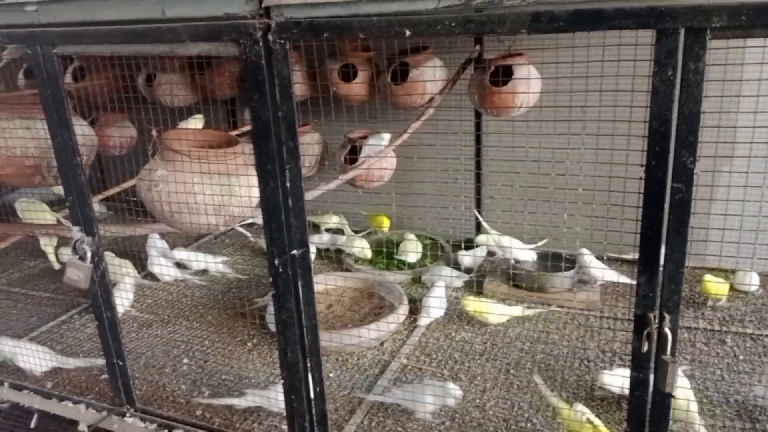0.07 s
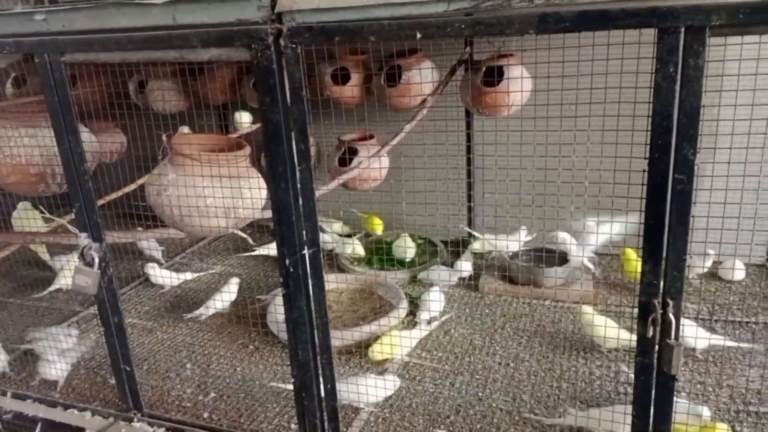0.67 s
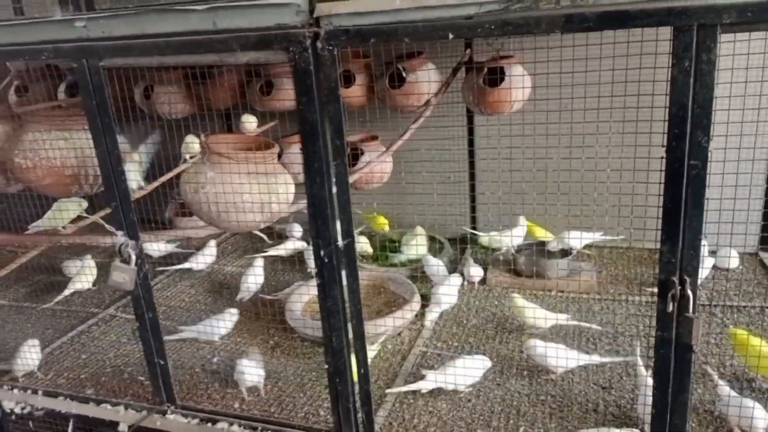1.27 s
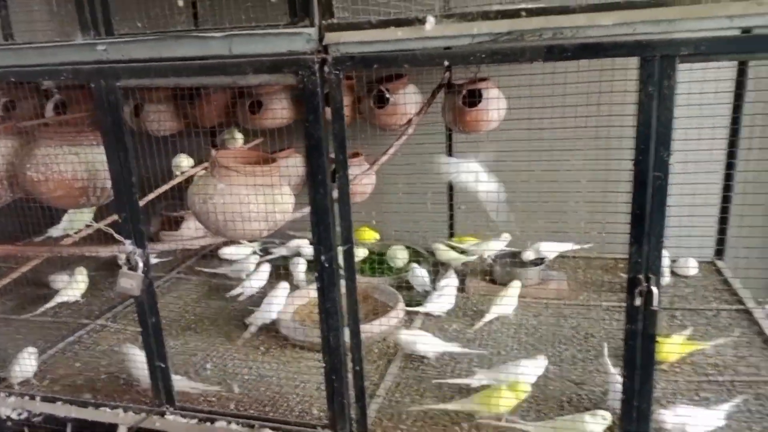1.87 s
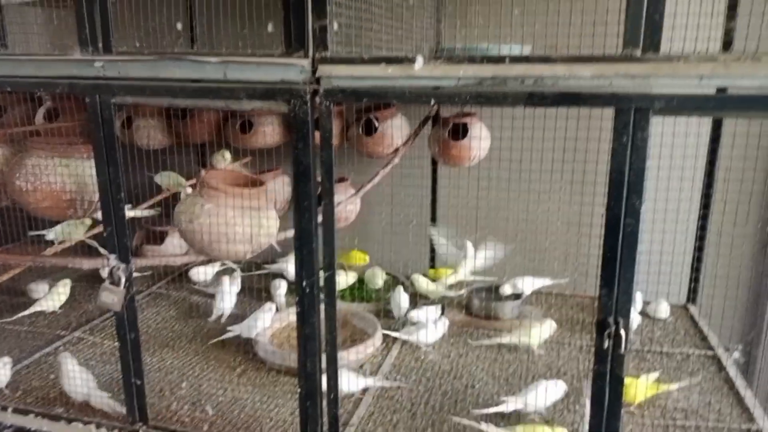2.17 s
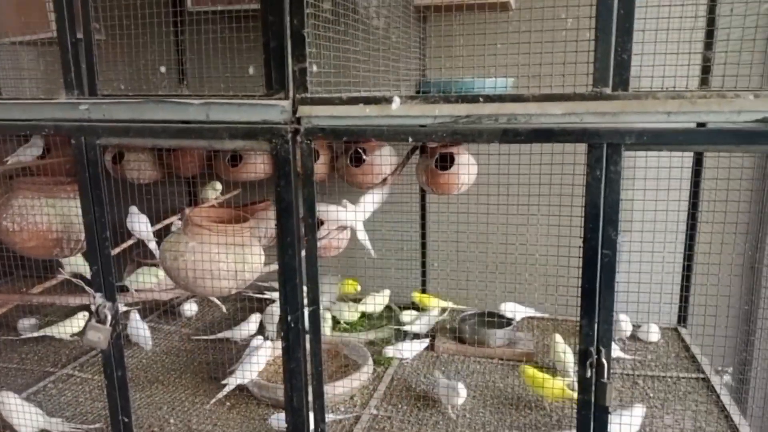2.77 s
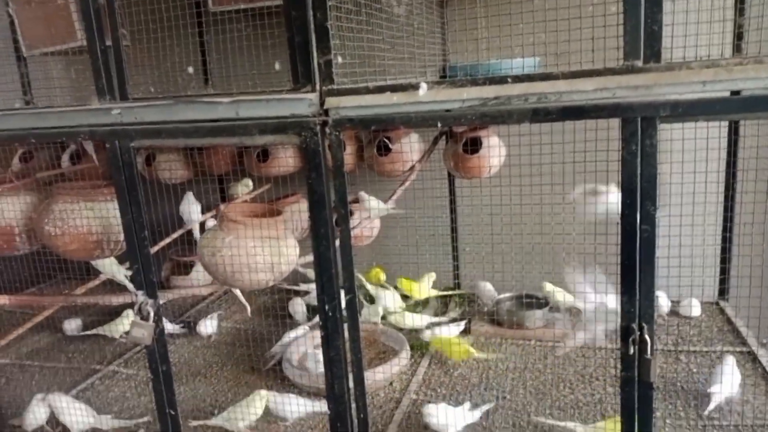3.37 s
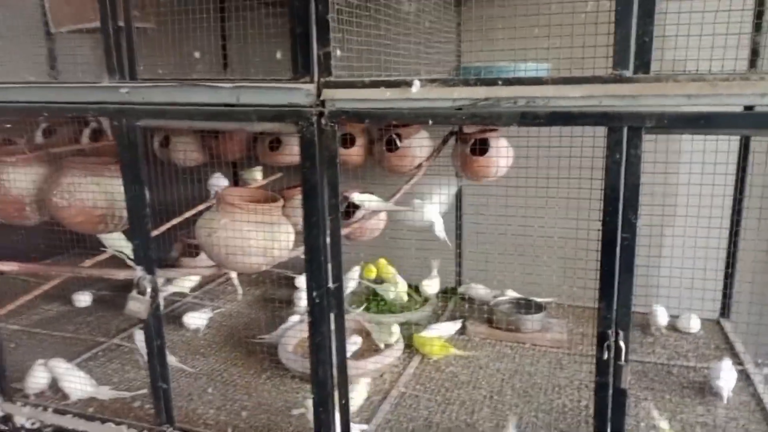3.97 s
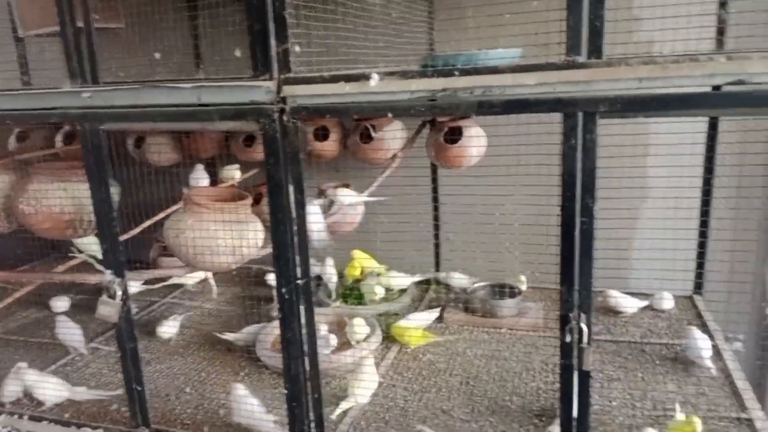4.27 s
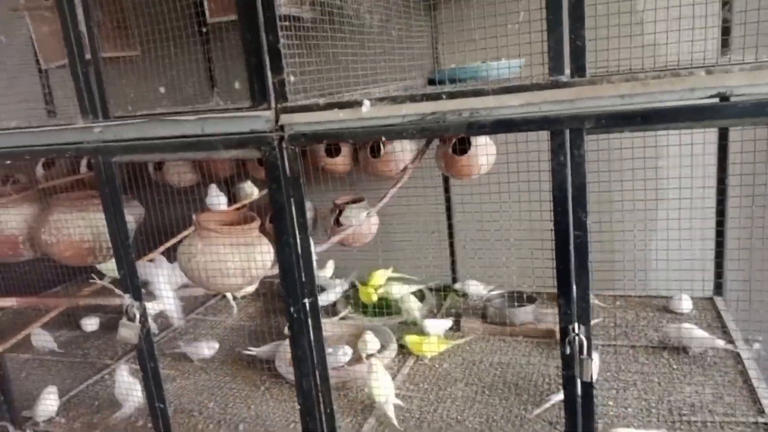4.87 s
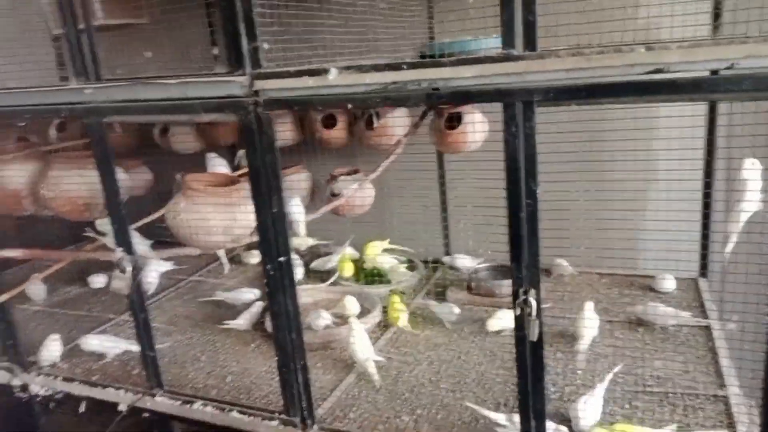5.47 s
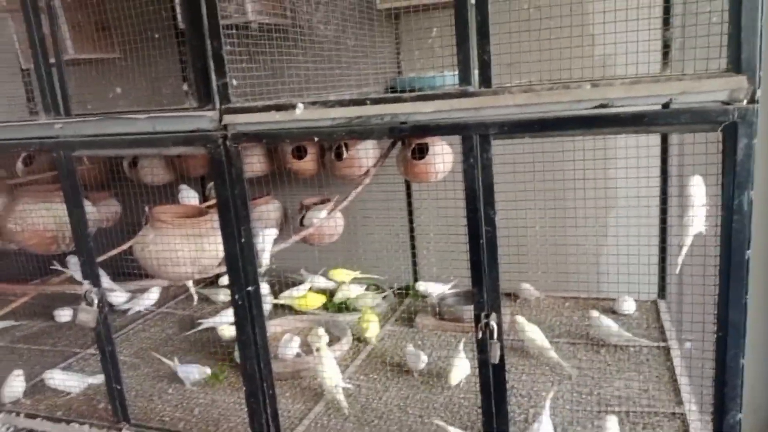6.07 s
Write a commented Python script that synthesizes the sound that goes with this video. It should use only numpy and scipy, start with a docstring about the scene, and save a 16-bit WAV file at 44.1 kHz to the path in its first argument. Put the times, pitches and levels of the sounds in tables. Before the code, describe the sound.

Close budgerigars chirp, warble and scold in short, high notes while more birds babble behind them, all ringing slightly off the aviary walls. The chatter thins for about a second near the middle, around two dull knocks, then returns with gliding calls and rasps. Now and then wings swish softly and a beak or claw ticks on the wire. The microphone is just outside the cage.

```python
"""A hard-walled aviary, heard through the wire from a step away: a flock of budgerigars chatters.
Near birds give four-syllable contact calls, chirp, slur, tweet and warble, each note a gliding tone of
the syrinx; slaps of the syrinx make their rasps. The rest babble behind. Wings swish, beaks and claws
tick on the wire, soft knocks ring a hollow body and feet patter.
The walls ring with all of it, over a low room rumble, hum and faint hiss."""
import sys
import numpy as np
from scipy import signal
from scipy.fft import rfft, irfft, next_fast_len
from scipy.io import wavfile
from scipy.ndimage import map_coordinates

SR = 44100
rng = np.random.default_rng(int(sys.argv[2]) if len(sys.argv) > 2 else 0)


def output_pcm(signal):
    """Save a mono or channel-first signal as 16-bit PCM at the path in sys.argv[1].

    Samples are clipped to [-1, 1] before scaling.
    """
    pcm = np.clip(np.atleast_2d(signal).T, -1, 1) * 32767
    wavfile.write(sys.argv[1], SR, np.round(pcm).astype(np.int16))


N = 269627

# Flip partials: (multiple of pitch, level [dB])
FLIP_TONE = [(1 / 2, -19), (1, 0), (3 / 2, -20), (2, -27), (5 / 2, -23)]
# Calls: (time [s], opening [Hz], closing [Hz], low syllable delay [s], low syllable [Hz],
# glide [share of pitch], level [dB], flip [Hz], flip level re call [dB])
CONTACT_CALLS = [(.629, 3514, 3480, 0.075, 3260, 0.025, -22, 4110, -15),
                 (2.766, 3398, 3630, 0.056, 3368, -0.029, -19.5, 3990, -2),
                 (3.689, 3484, 3568, 0.059, 3340, -0.017, -22.5, 3910, -9),
                 (4.822, 3612, 3750, 0.079, 3384, 0.057, -22, 3840, -0.5),
                 (5.203, 3435, 3400, 0.061, 3200, -0.018, -25.5, 3980, -10)]


def contact_calls(syllable_s=0.0287, flip_s=0.021, flip_after_s=0.032, close_after_s=0.103, swoop=2.14):
    """Pure whistle, higher flip, low syllable, burred close: all lean one way, the low one furthest."""
    out = np.zeros(N)
    for s, open_hz, close_hz, low_after_s, low_hz, slope, db, flip_hz, flip_db in CONTACT_CALLS:
        opening = syllable(syllable_s, open_hz, slope, rough=0.09)
        flip = syllable(flip_s, flip_hz, slope, rough=0.24, tone=FLIP_TONE)
        low = syllable(syllable_s, low_hz, swoop * slope, rough=0.14)
        close = syllable(syllable_s, close_hz, slope, rough=0.33)
        add(out, s, undb(db) * opening)
        add(out, s + flip_after_s, undb(db + flip_db) * flip)
        add(out, s + low_after_s, undb(db - 2) * low)
        add(out, s + close_after_s, undb(db - 2.3) * close)
    return out


# Whistle partials: (multiple of pitch, level [dB])
CHIRP_TONE = [(1, 0), (2, -26), (3, -34)]


def syllable(length_s, hz, slope, rough, tone=CHIRP_TONE, arch=0.0036, quaver=0):
    """One note swells, slides through its pitch on a slight arch and fades."""
    pitches_hz = (hz * (1 - arch - slope / 2), hz, hz * (1 - arch + slope / 2))
    voice = syrinx(length_s, pitches_hz, rough, tone, quaver=quaver)
    return voice * gate(len(voice), 0.12 * length_s, 0.18 * length_s)


def syrinx(length_s, pitches_hz, rough, tone, jitter=0.086, flutter=0.0394, shimmer_db=6, split_db=-12,
           buzz=0.46, quaver=0, quaver_hz=59.3, reed_hz=620):
    """The syrinx glides through pitches evenly spaced in time; when rough it trembles and buzzes."""
    n = int(length_s * SR)
    contour = np.polyfit(np.linspace(0, 1, len(pitches_hz)), pitches_hz, len(pitches_hz) - 1)
    hz = np.polyval(contour, np.linspace(0, 1, n))
    swing = np.sin(phase_of(quaver_hz * (1 + 0.25 * wander(n, 40))))
    hz = hz * (1 + quaver * swing + rough * flutter * wander(n, 220.3))
    phase = phase_of(hz)
    # a slower membrane swing puts the same sidebands round every partial
    reed = np.sin(phase_of(reed_hz * (1 + 0.221 * wander(n, 60))))
    burr = phase_of(hz * rough * (jitter * wander(n, 1306.6) + 0.17 * buzz * reed))
    voice = sum(undb(db) * np.sin(k * phase + burr) for k, db in tone if k * hz.mean() < 12000)
    if tone is CHIRP_TONE or tone is SLUR_TONE:
        period_doubling = np.sin(phase / 2 + burr) + 0.6 * np.sin(3 * phase / 2 + burr)
        voice = voice + rough * undb(split_db) * period_doubling
    shimmer = 1.5 * np.tanh(wander(n, 364.5))
    return voice * unit(undb(shimmer_db * rough * shimmer)) * gate(n, 0.0015, 0.0029)


# Chirps: (time [s], length [s], pitch [Hz], glide [share of pitch], level [dB])
CHIRPS = [(0.013, 0.047, 3352, -0.14, -30.5), (0.014, 0.045, 1823, 0.19, -33.5),
          (0.308, 0.05, 3435, 0.04, -33), (0.404, 0.079, 3630, -0.033, -33),
          (0.575, 0.023, 2590, -0.089, -31), (0.668, 0.036, 2785, -0.024, -30.5),
          (0.888, 0.033, 2856, 0.026, -29), (0.936, 0.015, 3590, -0.0097, -24.5),
          (.975, .024, 3636, -0.011, -21.5), (0.99, 0.052, 3630, -0.054, -32.5),
          (1.149, 0.011, 3220, 0.02, -24.5), (1.372, 0.047, 3640, -0.26, -25.5),
          (1.447, 0.048, 2960, -0.116, -29.5), (1.478, 0.017, 3100, 0.014, -22.5),
          (1.571, 0.047, 3083, -0.047, -31), (1.615, 0.042, 3577, 0.073, -26),
          (1.664, 0.019, 3713, 0.024, -19), (1.705, 0.028, 3720, 0.057, -43),
          (1.972, 0.021, 2960, -0.018, -22), (2.011, 0.038, 3010, -0.042, -29.5),
          (2.046, 0.029, 3275, -0.048, -28.5), (2.108, 0.033, 3013, 0.049, -26),
          (2.299, 0.1, 3560, 0.059, -36), (2.746, 0.023, 3650, -0.11, -36.5),
          (3.271, 0.068, 3310, -0.051, -43), (3.346, 0.014, 2720, -0.04, -34),
          (3.351, 0.016, 4550, -0.015, -52), (3.36, 0.017, 3610, 0.0057, -33),
          (3.42, 0.024, 3140, -0.043, -24), (3.948, .115, 3676, 0.005, -32.5),
          (3.997, 0.0056, 3300, -0.46, -22), (4.075, 0.012, 3486, -0.036, -23.5),
          (4.134, 0.02, 4160, -0.022, -23), (4.255, 0.16, 1605, -.03, -41.5),
          (4.429, 0.033, 3878, -0.055, -23.5), (5.188, 0.052, 1695, 0.082, -39.5),
          (5.322, 0.052, 3290, -0.11, -30), (5.384, 0.023, 4250, -0.12, -30),
          (5.594, 0.021, 2746, 0.26, -32.5), (5.781, 0.026, 3425, 0.062, -33),
          (5.906, 0.058, 1164, -0.11, -33), (5.986, 0.042, 2020, -0.047, -35.5),
          (6.063, 0.061, 3410, -0.46, -37)]


def chirps(easy_hz=3410, held_s=0.05):
    """Single glides, hoarser away from the bird's easiest pitch; a held whistle stays purer."""
    out = np.zeros(N)
    for s, length_s, hz, slope, db in CHIRPS:
        octaves = np.log2(hz / easy_hz)
        strain = max(-0.56 * octaves, 0.53 * octaves)
        rough = 0.14 + 0.32 * strain if length_s > held_s else 0.21 + strain
        add(out, s, undb(db) * syllable(length_s, hz, slope, min(rough, 0.95)))
    return out


# Slur partials: (multiple of pitch, level [dB])
SLUR_TONE = [(1, 0), (2, -24), (3, -25), (4, -35)]
# Slurs: (time [s], length [s], start [Hz], 1/3 [Hz], 2/3 [Hz], end [Hz], level [dB], roughness [0-1])
SLURS = [(1.765, 0.075, 3594, 3970, 3700, 3320, -40.5, 0.54),
         (1.808, 0.038, 2140, 2420, 2863, 3100, -31.5, 1),
         (1.862, 0.036, 3290, 2790, 2100, 1980, -32, 0.83),
         (1.902, 0.046, 3300, 3900, 3790, 3320, -29.5, 0.57),
         (1.936, 0.042, 3160, 2307, 1940, 1910, -32, 0.39),
         (1.944, 0.025, 3900, 3840, 3710, 3420, -37, 0.56),
         (2.076, 0.026, 2920, 2185, 2330, 2730, -27, .45),
         (3.385, 0.045, 2570, 2680, 2960, 3100, -30, 0.63),
         (3.975, 0.027, 2205, 2300, 2790, 4160, -31, 0.63),
         (4.143, 0.053, 4190, 2750, 2850, 3720, -27.5, 0.41),
         (4.375, 0.047, 2947, 3100, 3043, 2680, -27.5, 0.57),
         (5.012, 0.082, 4720, 4840, 4760, 4130, -27, 0.384),
         (5.234, 0.066, 2095, 2800, 3200, 3230, -29.5, 0.52),
         (5.287, 0.031, 4626, 4320, 4105, 3430, -25.5, 0.59),
         (5.327, 0.016, 4040, 5200, 6000, 6100, -42, 0.4),
         (5.375, 0.025, 6700, 6000, 4880, 3700, -40.5, 0.36),
         (5.40, 0.082, 3526, 3133, 2510, 2760, -34.5, 0.35),
         (5.47, 0.05, 3110, 3780, 3700, 3420, -28.5, 0.65),
         (5.626, 0.039, 3450, 3680, 3735, 3590, -26.5, 0.55),
         (5.651, 0.055, 2937, 2690, 2527, 2440, -30, 0.38),
         (5.715, 0.052, 3812, 3450, 3415, 3480, -26, 0.63),
         (5.935, 0.044, 2610, 2914, 2976, 2700, -33, 0.34)]


def slurs():
    """Calls whose pitch arches, dips or hooks without a break."""
    out = np.zeros(N)
    for s, length_s, *pitches_hz, db, rough in SLURS:
        voice = syrinx(length_s, pitches_hz, rough, SLUR_TONE,
                       buzz=0.37, jitter=0.049, shimmer_db=7, split_db=-14)
        add(out, s, undb(db) * voice * gate(len(voice), 0.0098, 0.0032))
    return out


# Tweet partials: (multiple of second harmonic, level [dB])
TWEET_TONE = [(1 / 2, -13), (1, 0), (3 / 2, -19), (2, -29)]
# Tweets: (time [s], length [s], second harmonic [Hz], glide [share of pitch], level [dB])
TWEETS = [(0, 0.015, 6320, -0.0026, -25.5), (0.016, 0.021, 7050, 0, -38.5),
          (0.037, 0.01, 6400, -0.022, -26), (0.046, 0.0073, 6920, 0.031, -31),
          (0.061, 0.0287, 5900, -0.058, -23.5), (0.089, 0.035, 6045, 0.07, -23),
          (0.135, 0.043, 6180, 0.033, -21.5), (0.172, 0.083, 5780, -0.1, -29),
          (0.77, 0.012, 6380, -0.04, -24.5), (0.803, .075, 6270, -0.019, -36),
          (0.877, 0.0417, 6110, -0.014, -27), (1.017, 0.042, 5670, 0.0084, -27.5),
          (1.426, 0.0037, 6830, -0.13, -32), (1.755, 0.0069, 6230, -0.25, -38),
          (1.77, 0.008, 6470, -0.18, -43), (1.806, 0.007, 6150, -0.25, -32.5),
          (1.818, 0.0057, 6000, 0.069, -36), (1.854, 0.0049, 6300, -0.2, -33),
          (1.862, 0.013, 6330, 0.18, -33), (1.909, 0.023, 7780, 0.025, -41.5),
          (2.535, 0.0073, 6660, 0.14, -32.5), (2.564, 0.0093, 6400, 0.041, -23.5),
          (2.59, 0.0041, 6960, -0.04, -23), (2.615, 0.0069, 6150, 0.17, -33),
          (2.624, 0.021, 5520, -0.31, -30.5), (2.674, 0.0081, 6260, 0.26, -26.5),
          (3.45, 0.0055, 6670, -0.017, -23.5), (3.489, 0.009, 5920, -0.19, -31),
          (3.521, 0.01, 6160, -0.28, -35), (3.544, 0.013, 7050, 0.056, -38),
          (3.594, 0.0077, 6010, 0.09, -30.5), (3.605, 0.0157, 6100, -0.17, -31.5),
          (3.647, 0.021, 6100, -0.14, -33), (3.718, 0.01, 6180, -0.18, -28.5),
          (3.832, 0.019, 6010, -0.2, -36), (4.117, 0.018, 5710, -0.19, -29),
          (4.646, 0.027, 5880, -0.048, -34.5), (4.698, 0.031, 5950, 0.082, -34),
          (4.827, 0.0223, 6380, -0.1, -39), (4.883, 0.018, 6320, 0.056, -40),
          (5.259, 0.018, 6370, .03, -37.5), (5.478, 0.0064, 6660, 0.13, -33),
          (5.524, 0.0114, 5840, 0.18, -37), (5.552, 0.008, 5720, 0.15, -39),
          (5.591, 0.0085, 6370, -0.14, -26.5), (5.711, 0.012, 6200, 0.08, -37),
          (5.758, 0.013, 6110, 0.05, -38)]


def tweets(roughen_s=0.012):
    """High arched notes led by the second harmonic: clean when brief, rough and quavering when long."""
    out = np.zeros(N)
    for s, length_s, hz, slope, db in TWEETS:
        strain = 1 - np.exp(-length_s / roughen_s)
        voice = syllable(length_s, hz, slope, 0.3 * strain, TWEET_TONE, arch=0.02, quaver=0.022 * strain)
        add(out, s, undb(db) * voice)
    return out


# Chip partials: (harmonic number, level [dB])
WARBLE_TONE = [(1, -27), (2, -3), (3, -7), (4, 0), (5, -18), (6, -26)]
# Warbled chips: (time [s], level [dB])
WARBLES = [(0.952, -27.5), (1.073, -31.5), (1.136, -27), (1.2, -28), (1.262, -29.5), (1.324, -28.5),
           (1.391, -33.5), (1.47, -27.5), (1.546, -26)]


def warbles(length_s=0.028, sweep_hz=(937, 1370, 1593, 1470), scatter=0.0235):
    """One bird repeats a chip that climbs and curls over, never at quite the same pitch."""
    out = np.zeros(N)
    for s, db in WARBLES:
        pitches_hz = np.array(sweep_hz) * (1 + scatter * rng.standard_normal(len(sweep_hz)))
        voice = syrinx(length_s, pitches_hz, rough=0.86, tone=WARBLE_TONE)
        add(out, s, undb(db) * voice * gate(len(voice), 0.0038, 0.019))
    return out


# Throat damping: (frequency [Hz], gain [dB])
THROAT = [(2000, 4.5), (7000, -1.5), (9000, 0), (12000, 3.5)]
# Scolding: (time [s], length [s], resonance [Hz], nominal width [Hz], level [dB])
RASPS = [(0.157, 0.028, 7600, 2000, -37), (0.239, 0.058, 6460, 1250, -20.5),
         (0.353, 0.038, 6380, 1610, -25), (0.355, 0.048, 3408, 850, -33), (0.458, 0.14, 4700, 1870, -38),
         (0.862, 0.086, 5310, 3330, -32), (0.94, 0.22, 5060, 2580, -39.5), (1.203, 0.036, 5070, 620, -23.5),
         (1.393, 0.27, 3002, 965, -41), (1.608, 0.044, 5770, 2550, -36), (2.144, 0.04, 3500, 2890, -35.5),
         (3.437, 0.14, 4080, 463, -39.5), (3.875, 0.076, 3855, 2140, -37),
         (4.198, 0.073, 5420, 2000, -25.5), (4.204, 0.058, 3550, 1130, -28.5),
         (4.329, 0.11, 5070, 1810, -29), (5.273, 0.1, 3900, 1330, -36.5), (5.907, 0.013, 3720, 1830, -29.5)]


def rasps(pulse_hz=330, closing_cycles=0.61, swing=0.39):
    """Uneven slaps of the syrinx chop a wildly trembling tone and throat turbulence into grains."""
    out = np.zeros(N)
    for s, length_s, hz, width_hz, db in RASPS:
        n = int(length_s * SR)
        cycle = np.cumsum(pulse_hz * (1 + 0.3 * wander(n, 300))) / SR % 1
        puffs = np.exp(-cycle / closing_cycles) * np.minimum(cycle / 0.045, 1)
        puffs *= undb(1.8 * wander(n, 260))
        tone = np.sin(phase_of(hz + swing * width_hz * wander(n, 2500)))
        throat = signal.iirpeak(hz, hz / (2.14 * width_hz), fs=SR)
        turbulence = signal.lfilter(*throat, signal.lfilter(*throat, rng.standard_normal(n)))
        grains = unit(puffs * (tone + 0.33 * unit(turbulence)))
        add(out, s, undb(db) * grains * gate(n, 0.3 * length_s, 0.59 * length_s))
    return colour(out, THROAT)


# Flock activity: (time [s], chirping level [dB], tweeting level [dB])
FLOCK = [(0, -35.5, -37), (.3, -43.5, -46.5), (.75, -35.5, -48), (0.951, -33.5, -40), (1.15, -43.5, -42),
         (1.5, -35.5, -49.5), (2.14, -35.5, -47.5), (2.26, -47, -59), (2.62, -55, -48), (2.86, -48, -40),
         (3.1, -58, -59.5), (3.329, -45, -54.5), (3.5, -40.5, -55.5), (3.9, -40.5, -47), (4.09, -40, -59),
         (4.36, -38.5, -39), (4.619, -40.5, -45), (5.1, -45, -55), (5.39, -37, -44.5), (6.11, -44, -55.5)]


def flock(chirp_trim_db=-0.2, tweet_trim_db=-1.9):
    """The babble swells and lulls with the mood of the flock."""
    s, chirping_db, tweeting_db = np.transpose(FLOCK)
    t = np.arange(N) / SR
    chirping = babble(1993.3, 4250, CHIRP_TONE, glide=0.17, count=270)
    tweeting = babble(4650, 6900, TWEET_TONE, glide=0.177, count=140)
    chirping *= undb(np.interp(t, s, chirping_db) + chirp_trim_db)
    tweeting *= undb(np.interp(t, s, tweeting_db) + tweet_trim_db)
    return chirping + tweeting


def babble(low_hz, high_hz, tone, glide, count):
    """Many birds further back, each note with its own pitch, slope, length and strength."""
    out = np.zeros(N)
    for i, (when, pitch, start, end, length, softness, rough) in enumerate(rng.random((count, 7))):
        hz = low_hz + (high_hz - low_hz) * pitch
        start_hz, end_hz = hz * (1 + glide * (2 * np.array([start, end]) - 1))
        voice = syrinx(0.007 + 0.02206 * length, (start_hz, hz, end_hz), 0.24 + 0.54 * rough, tone)
        add(out, (i + when) / count * N / SR, undb(-12 * softness) * voice)
    return unit(out)


# Feather spectrum: (frequency [Hz], gain [dB])
WING = [(100, -7), (300, -6.5), (600, -0.5), (1100, -7), (2200, -8.5), (5000, -17.5), (10000, -30)]
# Wing flurries: (time [s], length [s], level [dB])
FLURRIES = [(0.482, 0.16, -49.5), (1.002, 0.2, -52.5), (1.759, 0.16, -52), (2.381, 0.48, -52.5),
            (3.455, 0.2, -44.5), (4.032, 0.092, -46), (4.665, 0.16, -46.5)]


def wings(beat_hz=19, depth_db=5):
    """Feathers swish once every wing beat."""
    out = np.zeros(N)
    for s, length_s, db in FLURRIES:
        n = int(length_s * SR)
        beat = np.cos(phase_of(beat_hz * (1 + 0.2 * wander(n, 22))))
        swish = colour(rng.standard_normal(n), WING) * undb(depth_db * beat)
        add(out, s, undb(db) * unit(swish) * gate(n, length_s / 3, length_s / 3))
    return out


# Wire contacts: (time [s], peak [dB])
TICKS = [(1.078, -24), (2.165, -39), (2.402, -30), (3.912, -36), (4.998, -34)]


def ticks(decay_s=0.00055, ring_hz=4600):
    """Beaks and claws make tiny hard contacts with the wire."""
    out, t = np.zeros(N), np.arange(SR // 50) / SR
    wire = signal.iirpeak(ring_hz, 1, fs=SR)
    for s, db in TICKS:
        contact = rng.standard_normal(len(t)) * np.exp(-t / decay_s)
        click = signal.lfilter(*wire, signal.lfilter(*wire, contact))
        add(out, s, undb(db) * click / np.abs(click).max())
    return out


# Hollow body modes: (frequency at pitch factor 1 [Hz], level [dB], t60 [s])
KNOCK_MODES = [(142, -7.5, 0.026), (269, -15, 0.084), (410, 6.5, 0.027), (642, 2, 0.022), (856, -4, 0.035)]
# Knocks: (time [s], peak [dB], contact [s], pitch factor)
KNOCKS = [(2.128, -20.5, 0.0202, 0.98), (2.399, -24.5, 0.0134, 0.76), (2.417, -32, 0.019, 0.65),
          (3.557, -34.5, 0.011, 1.43), (3.769, -37, 0.0065, 1.8), (5.252, -35.5, 0.025, 0.68),
          (5.27, -33.5, 0.026, 0.44)]


def knocks(scuff=0.79):
    """A soft, scuffing push rings a dull hollow body."""
    out, t = np.zeros(N), np.arange(SR // 5) / SR
    for s, db, contact_s, pitch in KNOCKS:
        body = sum(undb(mode_db - 60 * t / t60) * np.cos(2 * np.pi * hz * pitch * t)
                   for hz, mode_db, t60 in KNOCK_MODES)
        n = int(contact_s * SR)
        push = scuff * wander(n, 1950 * pitch) + np.sin(2 * np.pi * 390 * pitch * t[:n]) / 2
        thud = signal.fftconvolve(body, np.hanning(n) * push)
        add(out, s, undb(db) * thud / np.abs(thud).max())
    return out


# Footfall spectrum: (frequency [Hz], gain [dB])
FOOTFALL = [(60, -26), (140, 8), (300, 3.5), (600, -0.5), (1100, -29), (3000, -26), (10000, -58)]
# Bouts of patter: (time [s], level [dB])
FEET = [(0, -62), (1.5, -63), (2.05, -54.5), (2.7, -57.5), (2.9, -62.5), (3.2, -55), (3.6, -65),
        (4.4, -60.5), (4.95, -63.5), (5.3, -61.5), (6.11, -62)]


def patter(taps_per_s=34, spread_db=4):
    """Dozens of small feet hop and tap on boards and clay."""
    landings = rng.random(N) < taps_per_s / SR
    strength = undb(spread_db * rng.standard_normal(N).clip(-2, 2))
    bout_db = np.interp(np.arange(N) / SR, *np.transpose(FEET))
    return undb(bout_db) * unit(colour(landings * strength, FOOTFALL))


# Room decay: (frequency [Hz], t60 [s])
ROOM = [(200, 0.59), (1500, 0.37), (3500, 0.59), (6500, 0.37), (12000, 0.26)]


def aviary(x, first_s=0.00039, build_s=0.002, sparse_s=0.025):
    """Separate echoes off floor and walls thicken into a tail whose top treble dies first."""
    t = np.arange(SR) / SR
    density = np.clip((t / sparse_s) ** 2 / 10, 0.004, 1)
    echoes = rng.standard_normal(SR) * (rng.random(SR) < density) / np.sqrt(density)
    spectrum = rfft(echoes)
    tail = np.zeros(SR)
    for band_hz, t60 in ROOM:
        share = on_log_axis([(hz, hz == band_hz) for hz, _ in ROOM], SR)
        tail += irfft(spectrum * share, SR) * undb(-60 * t / t60)
    tail *= np.clip((t - first_s) / build_s, 0, 1)
    return signal.fftconvolve(x, tail / np.sqrt(np.sum(tail ** 2)))[:N]


# Rumble spectrum: (frequency [Hz], gain [dB])
RUMBLE = [(15, -42), (25, -21), (43, -8.5), (79, -1), (107, 1.5), (150, -8), (209, -6), (593, -13),
          (776, -12), (1100, -9), (1430, -9.5), (2420, -120)]
# Hiss spectrum: (frequency [Hz], gain [dB])
AIR = [(300, -26.5), (1000, -2), (1600, 12.5), (2500, 0.5), (4000, -8.5), (6500, -6), (8000, 0),
       (12000, -15), (16000, -24)]


def background(rumble_db=-60, hum_hz=99, hum_db=-65, third_db=-69, air_db=-64):
    """Low room rumble, a wavering hum with its third harmonic, and faint hiss."""
    rumble = unit(colour(rng.standard_normal(N), RUMBLE)) * undb(rumble_db + 0.5 * wander(N, 5.71))
    phase = phase_of(hum_hz + 2 * wander(N, 12))
    hum = sum(undb(db) * unit(np.sin(k * phase) * undb(3 * wander(N, 4.5)))
              for k, db in ((1, hum_db), (3, third_db)))
    hiss = undb(air_db) * unit(colour(rng.standard_normal(N), AIR))
    return rumble + hum + hiss


def undb(db):
    """Decibels to gain."""
    return 10 ** (np.asarray(db) / 20)


def unit(x):
    """Scale to rms 1."""
    return x / np.sqrt(np.mean(x ** 2) + 1e-18)


def phase_of(hz):
    """Running phase [rad]."""
    return 2 * np.pi * np.cumsum(hz) / SR


def add(out, s, x):
    """Mix x into out from time s."""
    i = max(int(s * SR), 0)
    out[i:i + len(x)] += x[:max(len(out) - i, 0)]


def on_log_axis(points, n):
    """Read (frequency [Hz], value) points at the bins of an n-sample transform."""
    hz, value = np.transpose(points)
    return np.interp(np.log(np.fft.rfftfreq(n, 1 / SR) + 1), np.log(hz), value)


def colour(x, points):
    """Filter by a (frequency [Hz], gain [dB]) outline."""
    n = next_fast_len(len(x) + SR // 20, real=True)
    return irfft(rfft(x, n) * undb(on_log_axis(points, n)), n)[:len(x)]


def wander(n, rate_hz):
    """Smooth random curve, spread near 1."""
    place = np.arange(n) * rate_hz / SR
    knots = rng.standard_normal(int(place[-1]) + 4)
    return map_coordinates(knots, [place + 1], order=3, mode="nearest")


def gate(n, rise_s, fall_s):
    """Rounded onset and release."""
    t = np.arange(n) / SR
    onset = np.sin(np.pi / 2 * np.minimum(t / rise_s, 1))
    return onset * np.sin(np.pi / 2 * np.minimum(t[::-1] / fall_s, 1))


# Beak response: (frequency [Hz], gain [dB])
BEAK = [(1000, -13), (1500, -5.5), (2000, -4.5), (3000, -1), (6500, -1.5), (7300, -2), (8100, -2),
        (9200, -4), (11000, 0.5), (16000, 1.5)]
# Direct-path treble loss, birds facing away: (frequency [Hz], gain [dB])
OFF_AXIS = [(6800, 0), (9000, -2.5), (12000, -5.5)]


def scene(birds_wet_db=-4, far_dry_db=-3, knock_wet_db=-17, feet_dry_db=-6):
    """Near birds are mostly direct; flock and feet carry a larger share of room."""
    voices = contact_calls() + chirps() + slurs() + tweets() + warbles() + rasps()
    near = colour(voices, BEAK) + wings() + ticks()
    far, thuds, feet = colour(flock(), BEAK), knocks(), patter()
    direct = colour(near + thuds + undb(far_dry_db) * far + undb(feet_dry_db) * feet, OFF_AXIS)
    room = aviary(undb(birds_wet_db) * (near + far) + undb(knock_wet_db) * thuds + feet)
    return (direct + room + background())[None]


# Microphone response: (frequency [Hz], gain [dB])
MIC = [(20, -17.5), (50, -6), (100, 1.5), (7000, 0.5), (9000, 3), (11000, -19), (13000, -14), (16000, -20)]


def record(dry, top_hz=15700):
    """The phone thins the deep bass, dulls the top octave and cuts above it."""
    lowpass = signal.ellip(8, 0.2, 70, top_hz, fs=SR, output="sos")
    return signal.sosfilt(lowpass, colour(dry[0], MIC))[None]


dry = scene()
out = record(dry)
output_pcm(out)
```